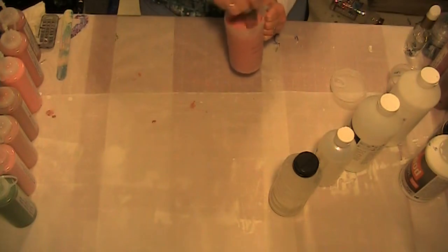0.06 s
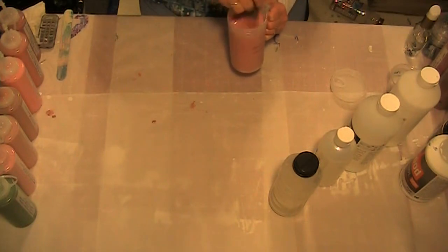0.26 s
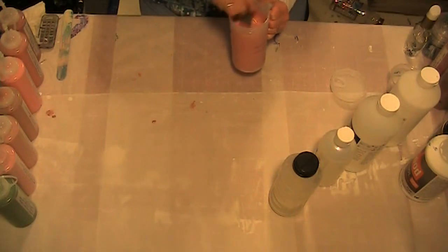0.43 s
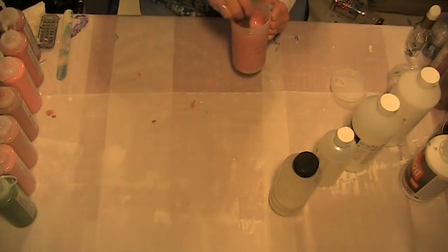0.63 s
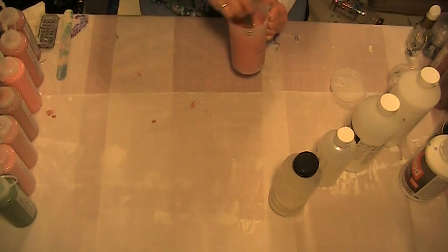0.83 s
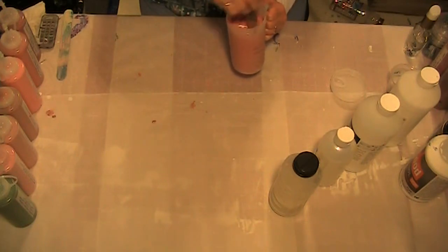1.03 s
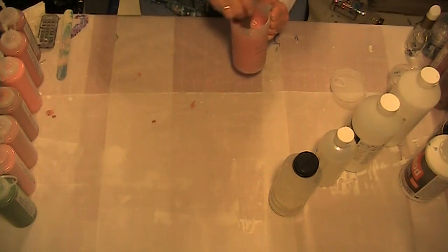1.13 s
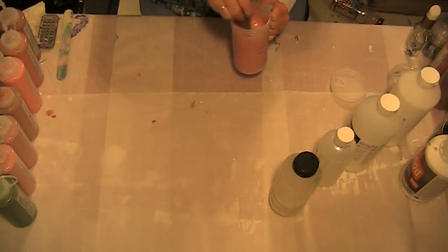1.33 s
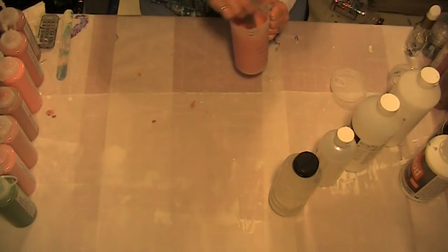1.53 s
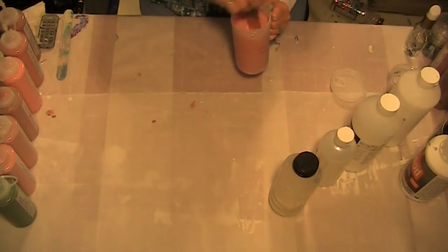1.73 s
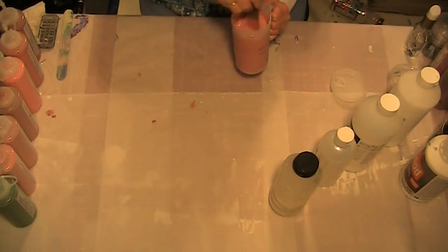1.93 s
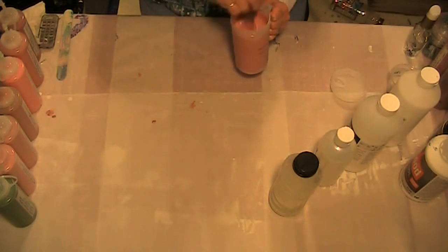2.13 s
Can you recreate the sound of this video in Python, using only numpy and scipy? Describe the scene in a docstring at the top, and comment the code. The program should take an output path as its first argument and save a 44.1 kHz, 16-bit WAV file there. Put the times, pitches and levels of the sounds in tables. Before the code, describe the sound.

Quick, even hollow knocks of a stick against a hand-held plastic cup while mixing thick paint

```python
"""In a small, quiet room with a faint hum and hiss, a stir stick beats thick paint in a hand-held plastic cup.
It knocks on the wall about four times a second and sometimes taps lightly on the way back.
Each contact excites damped resonances: a bright tick, then the hollow body of the cup a millisecond later.
The table and near walls answer with discrete echoes and a diffuse tail; objects on the table scatter treble.
Shaped noise makes the room tone, soft swishes and tiny sticky clicks of the paint."""
import sys
import numpy as np
from scipy import signal
from scipy.fft import rfft, irfft, next_fast_len
from scipy.io import wavfile

SR = 44100
rng = np.random.default_rng(int(sys.argv[2]) if len(sys.argv) > 2 else 0)


def file_out(sig):
    """Save sig as 16-bit WAV at sys.argv[1]."""
    # one column per channel
    cols = np.atleast_2d(sig).T
    # limit, then scale
    lim = np.clip(cols, -1, 1)
    pcm = np.round(lim * 32767).astype(np.int16)
    wavfile.write(sys.argv[1], SR, pcm)


N = 95917
T = np.arange(N) / SR  # s
SIZE = next_fast_len(N + SR)  # transform length, padded so that late echoes do not wrap round
HZ = np.fft.rfftfreq(SIZE, 1 / SR)
LN_60_DB = np.log(1000)  # a decay of 60 dB in nepers

# stereo width of the diffuse field: f/Hz, side minus mid level/dB
DIFFUSE_SIDE = [(300, -3), (700, -16), (1200, -11), (3500, -4), (7000, -9.5)]


def amp(db):
    """Level to amplitude: 20 dB is a factor of ten."""
    return 10 ** (np.asarray(db) / 20)


def along(points, hz=HZ):
    """Spectral envelope: (f, value) points joined linearly on a logarithmic frequency axis."""
    f, value = np.transpose(points)
    return np.interp(np.log(hz + 1), np.log(f + 1), value)


def delay(seconds):
    """Shift theorem: a delay is a phase falling linearly with frequency."""
    return np.exp(-2j * np.pi * HZ * seconds)


def decay(t, t60):
    """Exponential decay: the amplitude falls 60 dB in t60 seconds."""
    return np.exp(-LN_60_DB * t / t60)


def swell(centre, width):
    """Gaussian envelope: width/s is the time from the peak to 1/e."""
    return np.exp(-((T - centre) / width) ** 2)


def pan(db):
    """Interaural level difference: left and right gains, db being left minus right."""
    return amp(np.array([[db], [-db]]) / 2)


def sound(spectrum):
    """Fourier synthesis: spectrum to samples."""
    return irfft(spectrum, SIZE)[..., :N]


def spread(pair, side_db):
    """Mid-side stereo: two uncorrelated spectra, as sum and difference, give left and right."""
    mid, side = pair[0], amp(side_db) * pair[1]
    return np.array([mid + side, mid - side]) / np.sqrt(1 + amp(side_db) ** 2)


def noise(colour, side_db=0):
    """Filtered white noise: a spectral envelope shapes stereo noise, scaled to rms 1."""
    white = rfft(rng.standard_normal((2, SIZE)))
    x = sound(spread(white, side_db) * amp(along(colour)))
    return x / x.std()


def room_tone():
    """Stationary ambient noise: a steady random signal with a fixed, mostly falling spectrum."""
    # spectrum of the tone: f/Hz, level/dB
    tone_colour = [(25, -5.5), (60, -8.5), (130, -6.5), (265, -1.5), (330, -9), (400, -6), (700, -10),
                   (1250, -14), (1600, -17), (2200, -20), (4000, -25), (8000, -31.5), (15500, -40)]
    # stereo width: f/Hz, side minus mid level/dB
    tone_side = [(30, 14), (90, 4), (170, 4.5), (300, 0.5), (1000, 3), (3000, 3.5), (8000, 2.5)]
    return amp(-50.5) * noise(tone_colour, along(tone_side))


def hums():
    """Amplitude modulation: a faint sine heard only under brief Gaussian swells."""
    # swells: centre t/s, level/dB
    hum_swells = [(.01, -53.5), (1.016, -52.5)]
    hum_hz, width_s = 479, 0.021
    envelope = sum(amp(db) * swell(t, width_s) for t, db in hum_swells)
    return envelope * np.sin(2 * np.pi * hum_hz * T)


def swishes():
    """Modulated noise: Gaussian swells gate a coloured hiss."""
    # swells: centre t/s, width/s, level/dB
    swish_swells = [(0.019, 0.065, -54), (1.005, 0.036, -55), (1.972, 0.035, -55), (2.04, 0.067, -60.5)]
    # spectrum of the hiss: f/Hz, level/dB
    swish_colour = [(1000, 3), (2800, 4), (4800, -14), (6400, -5), (7400, -15), (9000, -20), (16000, -52)]
    envelope = sum(amp(db) * swell(t, width) for t, width, db in swish_swells)
    return envelope * noise(swish_colour)


def resonances(modes, pitch=1):
    """Modal superposition: damped second-order resonators, a little different at each contact."""
    detune, vary_db = .007, .3  # standard deviations: relative frequency, level/dB
    response = 0
    for k, (hz, width, db) in enumerate(modes):
        hz_draw, level_draw = rng.standard_normal(2)
        centre = hz * pitch * (1 + detune * hz_draw)
        gain = (-1) ** k * amp(db + vary_db * level_draw)  # neighbouring modes have opposite sign
        loss = 1j * HZ * width
        response = response + gain * loss / (centre ** 2 - HZ ** 2 + loss)
    return response


def contact(t, db, bright_db, edge_db, thump_db, pitch=1):
    """Impact excitation: a tick softened by the paint, then the lagging body of the cup."""
    # modes of the stick on the wall: nominal f/Hz, bandwidth/Hz, level/dB
    tick_modes = [(2780, 310, 4.5), (3435, 390, 12), (3893, 365, 9.5), (4560, 740, -2), (5530, 700, -5.5),
                  (7480, 490, -4.5)]
    # modes of the hollow cup: nominal f/Hz, bandwidth/Hz, level/dB
    body_modes = [(360.7, 111, 20), (591, 74, 22), (856, 201, 28.5), (1298.5, 183, 29.5), (1459, 154, 23),
                  (1799, 143, 21.5)]
    edge_hz, thump_hz, soft_hz, low_cut_hz = 4600, 560, 9700, 91
    body_lag_s = 0.001121
    # shelf weights, 0 to 1, that multiply a level in dB
    treble = HZ ** 4 / (HZ ** 4 + edge_hz ** 4)
    bass = thump_hz ** 4 / (HZ ** 4 + thump_hz ** 4)
    high, low = 1j * HZ / soft_hz, 1j * HZ / low_cut_hz
    # first-order high-pass and third-order Butterworth low-pass
    soft = low / (1 + low) / ((1 + high) * (1 + high + high ** 2))
    tick = resonances(tick_modes, pitch) * amp(bright_db)
    body = resonances(body_modes) * amp(thump_db * bass)
    body = body * delay(body_lag_s) / (1 + high)
    return amp(db + edge_db * treble) * delay(t) * soft * (tick + body)


def wall_knocks():
    """Linear superposition: the spectra of the main blows add."""
    # blows: t/s, strength/dB, tick level/dB, treble edge level/dB, low thump level/dB, tick pitch ratio
    blows = [(0.0868, -9, 0, -2.5, -1.5, 1.013), (0.3218, -11, 1, -15.5, -1, .99),
             (0.5663, -8, 0.5, -6, -3, 1.028), (0.8059, -10, 2, -7.5, -2.5, 1.025),
             (1.04, -12.5, 1, -10, 2.5, 1.015), (1.2776, -11.5, -0.5, -4.5, -1, 1.02),
             (1.5166, -13.5, -5.5, -6, 0.5, .98), (1.7546, -11.5, -1, -2.5, -2, 0.99),
             (1.9888, -10.5, -1, -12, -2, 0.97)]
    return sum(contact(*blow) for blow in blows)


def clutter():
    """Diffuse scattering: objects on the table return a short, dense, decaying spray of treble."""
    # treble scattered by the bottles and the table: f/Hz, level/dB
    scatter_colour = [(300, -22), (1200, -71), (1800, -30.5), (2300, 11.5), (3500, -10.5), (4800, -5),
                      (6200, 8), (7700, -4), (12000, 7)]
    spray = rng.standard_normal((2, N)) * decay(T, 0.1)  # t60 in s
    spray = rfft(spray / np.linalg.norm(spray[0]), SIZE)
    return spread(spray, along(DIFFUSE_SIDE)) * amp(along(scatter_colour))


def wall_echoes():
    """Specular reflection: the table and near walls return delayed, coloured copies."""
    # reflections: delay/ms, level/dB, left minus right level/dB
    reflections = [(3.45, -22, 0), (5.53, -21, -1), (7.76, -24, 4), (8.75, -16, -4), (10.05, -17, 4),
                   (10.77, -13, 2), (11.43, -15, 0), (13.13, -14, -2), (15.56, -21, -1), (17.85, -14, -2),
                   (19.23, -21, -2), (21.81, -16, -2), (23.79, -20, 1), (27.37, -22, -1), (30.95, -25, 0),
                   (39.32, -22, -1), (42.38, -21, -1), (48.03, -25, 0), (68.84, -25, 0), (76.12, -24, 0)]
    # colour common to all reflections: f/Hz, level/dB
    wall_colour = [(150, 4), (350, 3), (1300, -1), (1500, 6.5), (1850, -17.5), (3000, -25.5), (5000, -42)]
    echoes = sum(amp(db) * pan(lr_db) * delay(ms / 1000) for ms, db, lr_db in reflections)
    return echoes * amp(along(wall_colour))


def room():
    """Reverberation: discrete echoes, lingering modes and a frequency-dependent diffuse decay."""
    # lingering modes: f/Hz, level/dB, t60/s
    lingering = [(366.7, -41.5, 0.05), (444.3, -44, 0.26), (652, -95, 0.6), (1255.4, -65, 0.57)]
    # decay time of the diffuse tail: f/Hz, t60/s
    tail_t60 = [(200, 0.43), (900, 0.34), (1350, 0.35), (1800, 0.26), (3500, 0.47), (10000, 0.4)]
    # colour of the diffuse tail: f/Hz, level/dB
    tail_colour = [(150, -13.5), (400, -5.5), (900, -8), (1280, -6.5), (1500, -1), (1800, -8), (2300, 7),
                   (3500, -10), (4800, -6.5), (7500, -9)]
    start_s, rise_s = .003, 0.003
    hz, frame_t, z = signal.stft(rng.standard_normal((2, SR // 2)), SR, nperseg=256)
    t60 = along(tail_t60, hz)[:, None]
    unit_energy = np.sqrt(2 * LN_60_DB / (t60 * SR))  # long and short decays carry equal energy
    tail = signal.istft(z * amp(-60 * frame_t / t60) * unit_energy, SR, nperseg=256)[1]
    t = np.arange(tail.shape[1]) / SR
    rise = 1 - np.exp(-t / rise_s)
    ring = sum(amp(db) * decay(t, life) * np.cos(2 * np.pi * f * t) for f, db, life in lingering)
    diffuse = spread(rfft(tail * rise, SIZE), along(DIFFUSE_SIDE))
    diffuse = diffuse * amp(along(tail_colour)) * delay(start_s)
    return wall_echoes() + rfft(ring * rise, SIZE) + diffuse


def back_stroke_taps():
    """Rebound: each light tap is followed by one quick, weaker copy of itself."""
    # taps: t/s, strength/dB
    light_taps = [(.1950, -30), (0.429, -33.5), (0.6712, -29), (0.9092, -27), (1.149, -32.5), (1.386, -41)]
    bright_db, edge_db, thump_db = 3, 1, -8
    rebound_s, rebound_db = .0035, -6
    taps = sum(contact(t, db, bright_db, edge_db, thump_db) for t, db in light_taps)
    return taps * (1 + amp(rebound_db) * delay(rebound_s))


def stirring():
    """Convolution: knocks and taps from one spot share a single response of the surroundings."""
    knocks, taps = wall_knocks(), back_stroke_taps()
    tap_room_db = -2  # taps excite the surroundings a little less
    reflected = (room() + clutter()) * (knocks + amp(tap_room_db) * taps)
    return sound(knocks + taps + reflected)


def paint():
    """Impulsive noise: tiny sticky clicks start abruptly and decay exponentially."""
    # clicks: t/s, level/dB
    clicks = [(1.4388, -51), (1.678, -54.5), (2.153, -55)]
    # spectrum of the clicks: f/Hz, level/dB
    click_colour = [(500, -30), (3500, -19), (6000, 9), (9000, -6), (13500, -11), (16000, -12)]
    t60_s = 0.017
    pops = sum(amp(db) * (T >= t) * decay(abs(T - t), t60_s) for t, db in clicks)
    return pops * noise(click_colour)


def scene():
    """Superposition of all sources, with a level difference leaning slightly to the right."""
    background = room_tone() + hums() + swishes()
    return pan(-0.64) * (background + stirring() + paint())


def record(dry):
    """Band limitation: an ideal low-pass removes everything from 15.8 kHz up."""
    return sound(rfft(dry, SIZE) * (HZ < 15800))


dry = scene()
out = record(dry)
file_out(out)
```